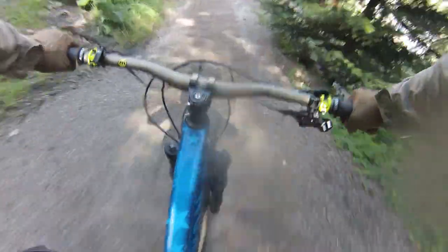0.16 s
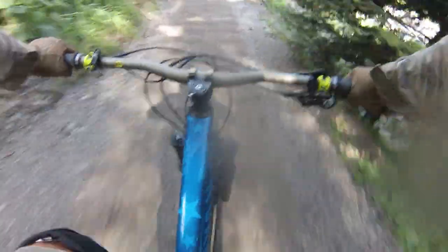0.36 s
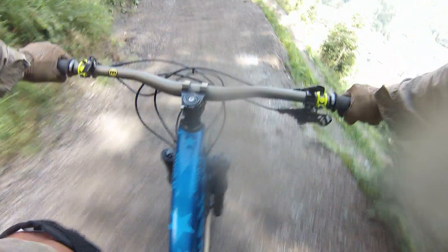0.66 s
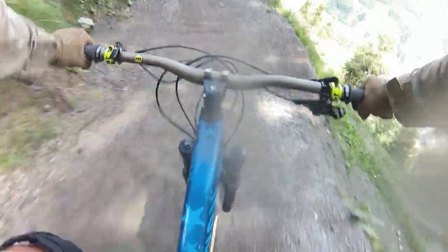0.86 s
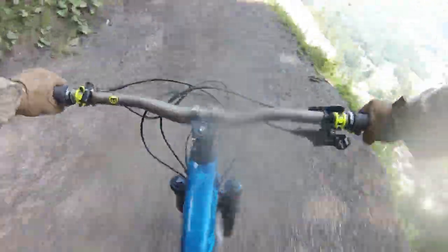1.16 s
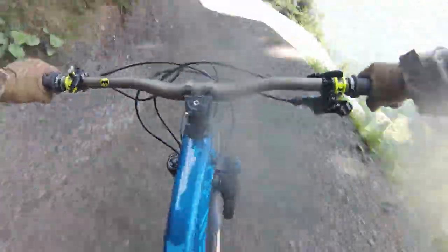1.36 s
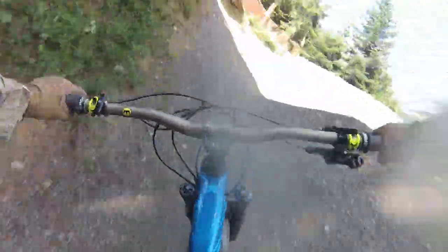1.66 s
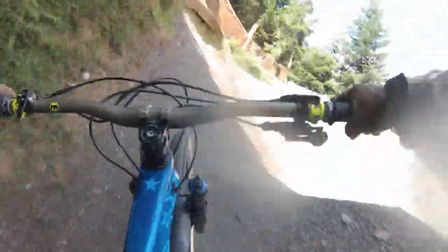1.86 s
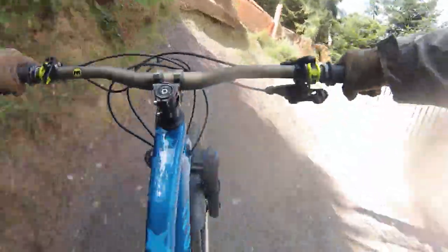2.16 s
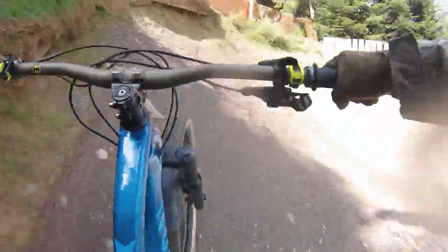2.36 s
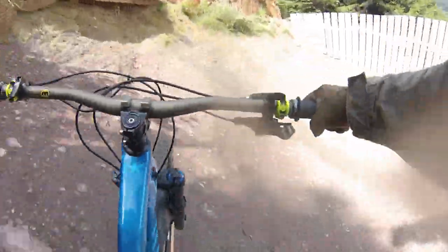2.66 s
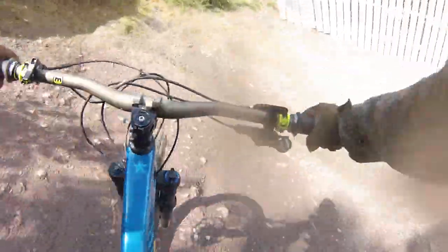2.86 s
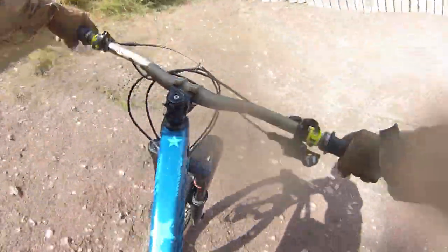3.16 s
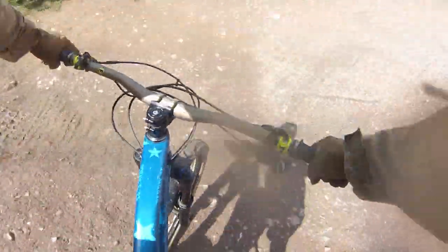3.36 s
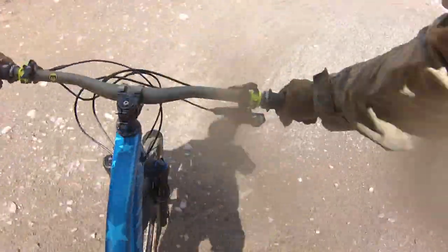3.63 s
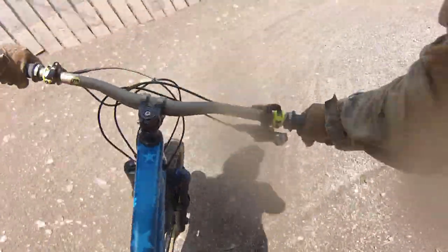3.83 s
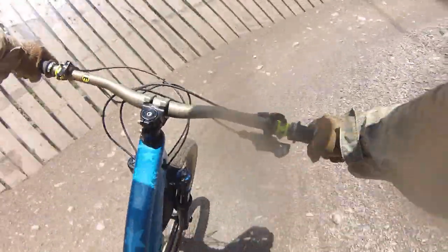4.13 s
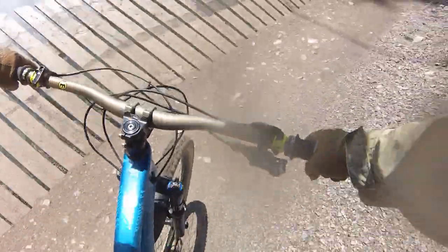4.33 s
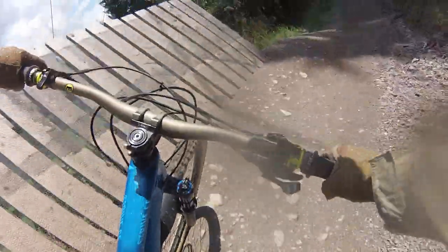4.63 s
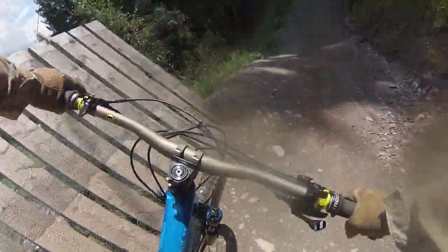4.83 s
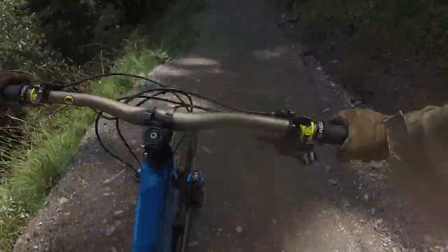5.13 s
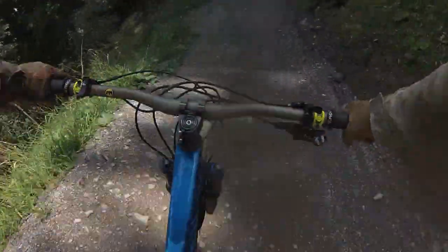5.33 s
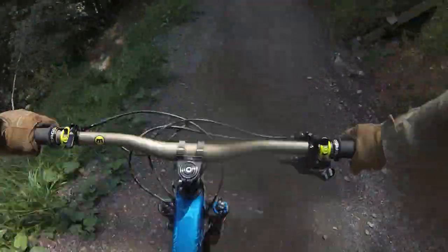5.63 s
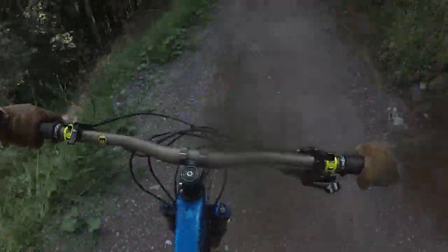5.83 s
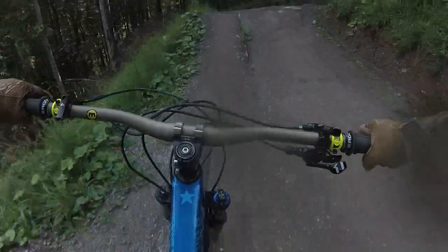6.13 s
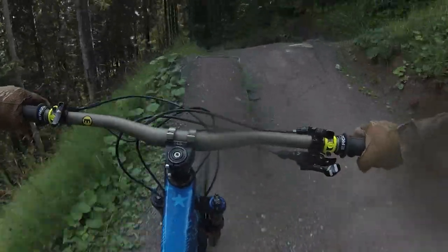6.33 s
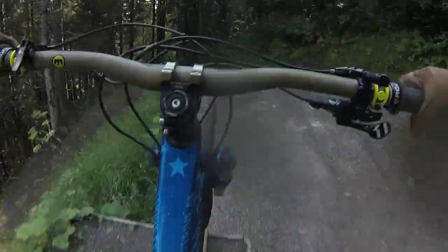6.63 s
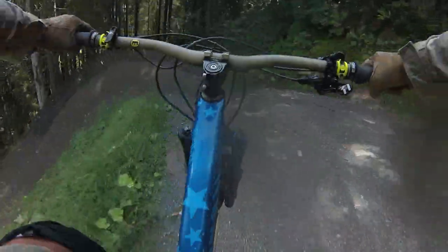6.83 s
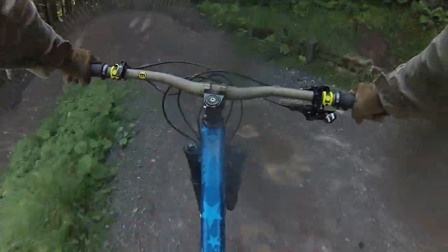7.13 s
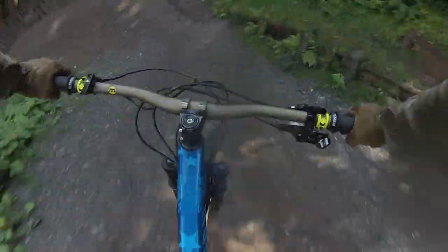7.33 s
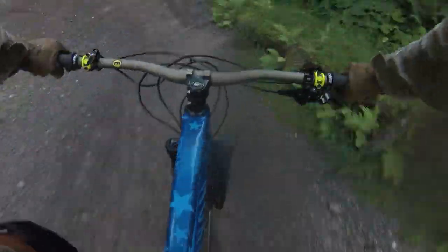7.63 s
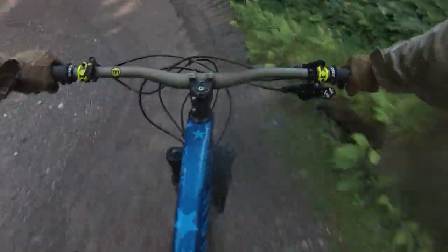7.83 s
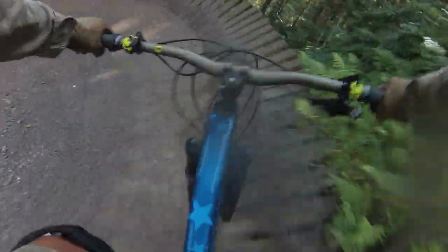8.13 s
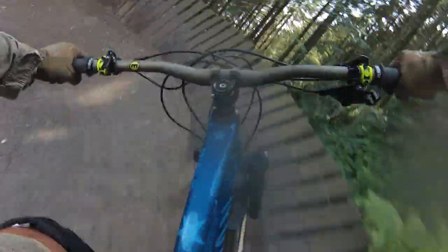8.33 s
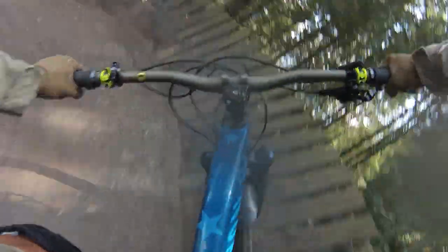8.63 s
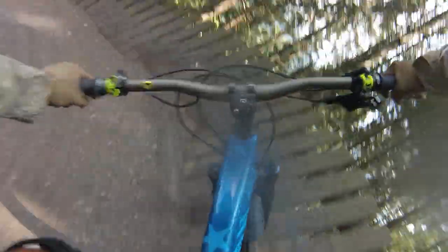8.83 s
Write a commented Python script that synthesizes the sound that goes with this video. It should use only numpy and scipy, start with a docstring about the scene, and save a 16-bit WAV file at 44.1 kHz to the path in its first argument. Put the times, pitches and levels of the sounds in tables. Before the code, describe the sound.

Close, from the rider's chest, mountain bike tyres rumble over dirt and crunch through loose gravel under low gusts of wind. Irregular plastic ticks from the camera mount mix with bright slaps and short ringing knocks on the frame. The noise eases, swells again, and the crunch and rattle briefly drop out over a small jump. After the landing, the roar softens into a faint tread hum on smoother ground.

```python
"""A mountain bike rolls fast down a gravel trail, heard by a cased camera on the rider's chest.
The tyres roar and crunch over stones while wind buffets the case and the camera ticks in its mount.
Chain, cables and flung stones slap the frame over the bumps and set its tubes ringing.
At the end the ground turns smooth: the roar drops and the tread hums."""
import sys
import numpy as np
from scipy import signal
from scipy.fft import rfft, irfft, next_fast_len
from scipy.io import wavfile

SR = 44100
rng = np.random.default_rng(int(sys.argv[2]) if len(sys.argv) > 2 else 0)


def int16_out(signal):
    """Quantize to a 16-bit WAV file."""
    q = np.round(np.clip(np.atleast_2d(signal).T, -1, 1) * 32767)
    wavfile.write(sys.argv[1], SR, q.astype(np.int16))


N = 396018

# Modes of the plastic case. Each row: pitch in Hz, level in dB, time to fall 60 dB in seconds.
CASE_MODES = [(1100, -14, 0.036), (1395, -0.5, 0.01), (2525, 9.5, 0.011), (2653, 4, 0.015),
              (3120, -5, 0.026), (4600, -9, 0.011), (8100, -13, 0.0079), (12350, -12, 0.0044)]
# Modes of the frame tubes. Each row: pitch in Hz, level in dB, time to fall 60 dB in seconds.
TUBE_MODES = [(447, -21.5, 0.048), (983, -10.5, 0.04), (1227, -12, 0.029)]


def gain_of(db):
    """Decibels to gain."""
    return 10 ** (np.asarray(db) / 20)


def unit_rms(x):
    """Scales to rms 1."""
    return x / np.sqrt(np.mean(x ** 2) + 1e-20)


def add(mix, start, sound):
    """Lays a sound into the mix at a start in seconds."""
    part = mix[max(round(start * SR), 0):][:len(sound)]
    part += sound[:len(part)]


def coloured(x, spectrum):
    """Shapes a sound by an EQ curve of (Hz, dB) points, rms 1."""
    size = next_fast_len(len(x))
    points_hz, db = np.transpose(spectrum)
    hz = np.fft.rfftfreq(size, 1 / SR)
    curve = gain_of(np.interp(np.log(hz + 1), np.log(points_hz), db))
    return unit_rms(irfft(rfft(x, size) * curve, size)[:len(x)])


def flutter(hz):
    """A random waver, mostly slower than hz, rms 1."""
    return unit_rms(signal.lfilter(*signal.butter(2, hz, fs=SR), rng.standard_normal(N)))


def ring(modes, detune=1, lift_db=0, rise_s=0.00057):
    """Dying sines after a blow, scaled to peak 1 before lift_db shifts the modes under 2 kHz."""
    hz, db, t60 = np.transpose(modes)[:, :, None]
    t = np.arange(2000) / SR
    partials = gain_of(db - 60 * t / t60) * np.sin(2 * np.pi * hz * detune * t)
    partials *= 1 - np.exp(-(t / rise_s) ** 2)
    return (partials * gain_of(lift_db * (hz < 2000))).sum(0) / abs(partials.sum(0)).max()


def grains(per_s, spread_db, t60):
    """Random puffs of noise with sharp starts; a few are large."""
    sizes = gain_of(spread_db * np.minimum(rng.exponential(1, N), 4))
    onsets = rng.random(N) < per_s / SR
    decay = gain_of(-60 / (t60 * SR))
    return signal.lfilter([1], [1, -decay], sizes * onsets) * rng.standard_normal(N)


def ride_db(layer):
    """The fader of the "wind" or the "roar" along the trail."""
    # Each row: time in seconds, wind level in dB, roar level in dB before its drop on smooth ground.
    faders = [(0.0, -35, -37), (0.32, -40.5, -34), (0.37, -34, -37), (0.6, -43, -33), (1.07, -36.5, -35.5),
              (1.15, -43.5, -35.5), (2.37, -43.5, -49), (2.4, -51, -48), (3.3, -49, -48.5),
              (3.83, -43, -42), (4.05, -46, -43), (4.45, -40, -41), (4.6, -44, -41.5), (5.13, -39, -43.5),
              (5.33, -26, -34.5), (5.38, -33.5, -36), (6.3, -40.5, -34.5), (6.88, -27, -38.5),
              (6.93, -33, -39), (7.6, -38, -35), (8.85, -50.5, -41), (8.98, -55, -44)]
    times, wind_db, roar_db = np.transpose(faders)
    return np.interp(np.arange(N) / SR, times, {"wind": wind_db, "roar": roar_db}[layer])


def grit_db():
    """Looseness of the ground as a crunch level, hushed during a short jump near 7 s."""
    # Each row: time in seconds, crunch level in dB.
    looseness = [(0.0, -60.5), (0.14, -50.5), (0.77, -49), (1.2, -48), (1.46, -59), (1.86, -61),
                 (2.11, -68.5), (3.0, -62.5), (3.28, -69), (3.81, -55.5), (4.15, -62), (4.92, -61.5),
                 (5.65, -59), (6.01, -54), (6.21, -58.5), (6.6, -60.5), (6.99, -70), (7.28, -67),
                 (7.325, -54.5), (8.23, -52), (8.57, -59), (8.98, -58)]
    return np.interp(np.arange(N) / SR, *np.transpose(looseness))


def wind():
    """Lumpy low buffeting on the case, in quick gusts."""
    # Colour of the buffeting. Each row: frequency in Hz, relative level in dB.
    spectrum = [(10, -29), (30, 4), (60, -2), (96, -5), (150, -11), (300, -21), (700, -27.5), (2000, -74)]
    gusts_db = 1.8 * flutter(hz=5.1) + 1.2 * flutter(hz=5.1)
    rumble = coloured(rng.standard_normal(N), spectrum)
    return gain_of(ride_db("wind")) * unit_rms(rumble * gain_of(gusts_db))


def tyres():
    """Knobs drum on the dirt in a wavering roar, stones pop under them, and the air inside sings."""
    # Colour of the roar. Each row: frequency in Hz, relative level in dB.
    spectrum = [(40, -34), (90, 1), (140, -1.5), (250, -2), (320, -4.5), (520, -7.5), (620, -9.5),
                (800, -13), (980, -12), (1450, -20), (1900, -36), (4000, -70)]
    # Modes of the air in the tyre. Each row: pitch in Hz, level in dB, time to fall 60 dB in seconds.
    cavity_modes = [(252.4, 6, 0.13), (499, -5.5, 0.16)]
    smooth_from_s, smooth_db = 8.23, -4
    drumming = rng.standard_normal(N) * gain_of(1.76 * flutter(hz=21))
    pops = unit_rms(grains(per_s=150, spread_db=1.5, t60=0.054))
    roar = coloured(drumming + 0.5 * pops, spectrum)
    roar_db = ride_db("roar") + smooth_db * (np.arange(N) / SR > smooth_from_s)
    air = unit_rms(signal.oaconvolve(rng.standard_normal(N), ring(cavity_modes))[:N])
    return gain_of(roar_db) * roar + gain_of(-12 + 0.67 * grit_db()) * air


def gravel():
    """Stones grind into a hiss and snap one by one, each size in its own colour."""
    # Colour of the crunch. Each row: frequency in Hz, relative level in dB.
    spectrum = [(800, -21), (2000, 10.5), (4000, 2.5), (6000, 2.5), (7500, 0), (10000, -7), (12500, -12),
                (13500, -18), (15000, -17)]
    grind = rng.standard_normal(N) * gain_of(2.2 * flutter(hz=13))
    snaps = np.zeros(N)
    for hz in (2470, 4450, 8750, 10800):
        band = signal.butter(1, [hz / 1.5, hz * 1.08], "band", fs=SR)
        snaps += signal.lfilter(*band, grains(per_s=42, spread_db=4, t60=0.023))
    snap_gain = gain_of(17.5 + 0.32 * grit_db())  # looser ground leans towards snaps
    return gain_of(grit_db()) * coloured(grind + snap_gain * unit_rms(snaps), spectrum)


def clatter():
    """Small stones pelt the frame tubes, more on loose ground; the tubes ring only briefly."""
    pelting = grains(per_s=300, spread_db=3, t60=0.015)
    damped_tubes = ring(TUBE_MODES) * gain_of(-60 * np.arange(2000) / SR / 0.044)
    return gain_of(0.9 * grit_db()) * unit_rms(signal.oaconvolve(pelting, damped_tubes)[:N])


def hiss():
    """A faint, steady, bright hiss under the ride."""
    # Colour of the hiss. Each row: frequency in Hz, relative level in dB.
    spectrum = [(1500, -10), (4000, -1), (5500, 2), (6150, 4), (6800, -0.5), (10000, -1), (11200, 4.5),
                (12300, -5), (15500, -2)]
    return gain_of(-73) * coloured(rng.standard_normal(N), spectrum)


def camera_case():
    """The plastic case hums under dense shaking, and carries the ticks and rubs of its mount."""
    low_modes = [mode for mode in CASE_MODES if mode[0] < 4000]  # soft contact wakes only these
    body = ring(low_modes, lift_db=-8)
    shaking = rng.standard_normal(N) + unit_rms(grains(per_s=200, spread_db=1.5, t60=0.0052))
    hum = gain_of(-11 + 0.77 * grit_db()) * unit_rms(signal.oaconvolve(shaking, body)[:N])
    out = hum + mount_ticks() + mount_rubs() / np.linalg.norm(body)
    for hz, q in ((1900, 3.5), (3900, 4)):  # groups of modes cancel between them
        out = signal.lfilter(*signal.iirnotch(hz, q, fs=SR), out)
    return out


def mount_ticks():
    """The camera knocks in its mount and bounces once; the case rings a little differently each time."""
    # Each row: start in seconds, level in dB before the low lift, bounce in dB against the knock.
    ticks = [(0.0292, -26.5, -23), (0.0933, -23, -15), (0.247, -25.5, -20), (0.2988, -28, -20),
             (0.3502, -27, -20), (0.3687, -23.5, -23), (0.4476, -18.5, -24), (0.535, -35, 3),
             (0.5537, -23, -20), (0.5608, -17, -5), (0.6175, -21.5, -13), (0.651, -24, -5),
             (0.6641, -27, -18), (0.6813, -22, -17), (0.794, -29, -23), (0.8154, -15, -9), (0.924, -29, -2),
             (0.955, -18.5, -9), (1.0142, -22.5, -20), (1.182, -24, -20), (1.2135, -22.5, -14),
             (1.3649, -25, -1), (1.471, -23, -22), (1.5198, -22, -20), (1.5284, -29, -20),
             (1.68, -25.5, -20), (1.7498, -25.5, 3), (1.934, -24.5, -3.5), (2.5426, -30, -9),
             (2.604, -28, 1.5), (2.849, -43, -15), (2.9121, -18, -22), (2.9644, -27, -11),
             (3.066, -42, -18), (3.303, -48, -18), (3.361, -42, -19), (3.485, -35, -19), (3.544, -36, -10),
             (3.6776, -34, -20), (3.787, -24, -20), (3.821, -22, -6), (3.9917, -21.5, -10),
             (4.0809, -30.5, -4), (4.1404, -20, -4.5), (4.329, -26.5, -19), (4.509, -18.5, -8),
             (4.6156, -23.5, -10), (4.642, -43, -15), (4.67, -26.5, -8), (4.819, -41, -11),
             (4.898, -38.5, -8), (4.9734, -35, -15), (5.126, -35.5, -13), (5.3786, -31, 4),
             (5.415, -38, -3), (5.479, -24, -4.5), (5.535, -40, -9), (5.641, -32, -20), (5.6725, -31, -18),
             (5.677, -22.5, -7), (5.74, -21.5, -23), (5.8133, -19, -8.5), (5.8722, -25, -2),
             (5.9204, -20.5, -20), (6.0091, -20.5, -8), (6.119, -31, -20), (6.1541, -26, 1.5),
             (6.1652, -24.5, -7), (6.3988, -25.5, -20), (6.483, -31, -17), (6.608, -26, -18),
             (6.631, -31, -18), (6.649, -30, -20), (6.7608, -29.5, -22), (7.323, -33, -23),
             (7.332, -29.5, -17), (7.5586, -30, -20), (7.585, -21.5, -4.5), (7.678, -26.5, -20),
             (7.71, -24.5, -5), (7.7667, -31, -22), (7.7952, -18, -9), (7.901, -34, -15), (8.176, -32, -15),
             (8.306, -47, -15), (8.3408, -20, -10), (8.409, -26.5, -22), (8.4543, -20.5, -27),
             (8.4883, -23.5, -20), (8.5625, -24.5, -20), (8.5672, -23.5, -24), (8.6793, -30, -20),
             (8.7267, -22.5, 2), (8.7351, -27, 2.5), (8.8488, -34, -15), (8.878, -29, -17),
             (8.925, -22.5, -5), (8.932, -25.5, -17)]
    hard_db, softening = -9, 0.6  # each dB under a hard knock lifts the low modes by 0.6 dB
    snap_shape = np.r_[np.zeros(12), gain_of(-19 - 60 * np.arange(400) / SR / 0.008)]
    bright_band = signal.butter(3, [4400, 12800], "band", fs=SR)
    detunes = rng.uniform(0.939, 1.101, (len(ticks), len(CASE_MODES), 1))
    noises = rng.standard_normal((len(ticks), len(snap_shape)))
    bounce_delays_s = rng.uniform(0.00442, 0.0055, len(ticks))
    out = np.zeros(N)
    for (start, db, bounce_db), detune, noise, delay in zip(ticks, detunes, noises, bounce_delays_s):
        knock = ring(CASE_MODES, detune, lift_db=softening * (hard_db - db))
        add(knock, 0, snap_shape * signal.lfilter(*bright_band, noise))  # dry snap of contact
        add(out, start, gain_of(db) * knock)
        add(out, start + delay, gain_of(db + bounce_db) * knock)
    return out


def frame_slaps():
    """Chain, cables and flung stones crack brightly on the frame, coloured by where they land."""
    # Each row: start in seconds, level in dB, time to fall 60 dB in seconds.
    slaps = [(0.0802, -32.5, 0.011), (0.1667, -42, 0.0093), (0.2268, -42, 0.03), (0.2738, -38, 0.016),
             (0.2829, -34, 0.01), (0.2914, -35, 0.016), (0.3524, -35.5, 0.019), (0.404, -38, 0.015),
             (0.5552, -9.5, 0.0043), (0.6013, -33, 0.038), (0.617, -35, 0.056), (0.636, -28, 0.015),
             (0.6537, -35, 0.038), (0.677, -36.5, 0.07), (0.7126, -27, 0.0058), (0.7323, -35, 0.038),
             (0.7486, -36, 0.015), (0.78, -39, 0.031), (0.8783, -41, 0.024), (0.9165, -37, 0.018),
             (0.9568, -20, 0.0066), (1.018, -35.5, 0.015), (1.0845, -37.5, 0.033), (1.194, -40, 0.022),
             (1.25, -37.5, 0.022), (1.3767, -41.5, 0.022), (2.541, -46, 0.017), (2.724, -48, 0.012),
             (2.8228, -46, 0.012), (2.8307, -39.5, 0.0066), (2.8418, -45, 0.012), (3.0078, -42, 0.0044),
             (3.271, -46, 0.0092), (3.4575, -48, 0.012), (3.646, -42.5, 0.012), (3.741, -45, 0.019),
             (3.821, -24, 0.012), (5.0546, -42.5, 0.013), (5.167, -45, 0.015), (5.2316, -43, 0.017),
             (5.241, -37.5, 0.011), (5.4003, -43, 0.012), (5.6207, -43, 0.013), (6.009, -28, 0.022),
             (6.0223, -45, 0.018), (7.34, -42, 0.014), (7.5922, -44, 0.053), (7.645, -31.5, 0.0095),
             (7.6852, -37.5, 0.016), (7.7087, -39, 0.018), (7.727, -38, 0.029), (7.7742, -37.5, 0.013),
             (7.8452, -38, 0.013), (7.8744, -36.5, 0.015), (7.961, -38, 0.021), (8.007, -36, 0.032),
             (8.0197, -42, 0.053), (8.0363, -37, 0.017), (8.083, -48, 0.015), (8.113, -44, 0.02),
             (8.172, -46, 0.063), (8.3044, -38.5, 0.018), (8.363, -45.5, 0.086)]
    brightest_hz, spread = 6600, 0.11
    out, t = np.zeros(N), np.arange(3000) / SR
    hz = np.fft.rfftfreq(len(t), 1 / SR) + 1
    band = 1 / (1 + (3000 / hz) ** 4) / (1 + (hz / 12500) ** 6)
    for start, db, t60 in slaps:
        noise = rng.standard_normal(len(t))
        centre_hz = brightest_hz * np.exp(spread * noise[0])
        colour = band * (0.8 + np.exp(-(np.log(hz / centre_hz) / 0.25) ** 2))
        envelope = gain_of(-60 * t / t60) * (1 - np.exp(-t / 0.0003))
        add(out, start, gain_of(db) * unit_rms(irfft(rfft(noise) * colour)) * envelope)
    return out


def tube_knocks():
    """Blows ring the frame tubes, each at slightly different pitches."""
    # Each row: start in seconds, peak level in dB.
    knocks = [(0.349, -20.5), (0.424, -28), (0.53, -32), (0.555, -27), (0.621, -22.5), (0.675, -23),
              (0.731, -28.5), (0.923, -30), (1.055, -25), (1.181, -23.5), (3.39, -37.5), (3.637, -33.5),
              (3.82, -23), (6.006, -27), (7.705, -25.5), (8.305, -31)]
    out = np.zeros(N)
    for start, db in knocks:
        detune = rng.uniform(0.92, 1.03, (len(TUBE_MODES), 1))
        add(out, start, gain_of(db) * ring(TUBE_MODES, detune, rise_s=0.0011))
    return out


def stone_thuds():
    """A stone knocks dully under the frame."""
    # Each row: start in seconds, peak level in dB.
    thuds = [(2.961, -19), (3.819, -26.5)]
    # Modes of the thud. Each row: pitch in Hz, level in dB, time to fall 60 dB in seconds.
    modes = [(300, 7, 0.019), (540, 2.5, 0.042), (1080, 0.5, 0.032), (1276, -3, 0.034)]
    out = np.zeros(N)
    for start, db in thuds:
        add(out, start, gain_of(db) * ring(modes, rise_s=0.0021))
    return out


def mount_rubs():
    """The case rubs in its mount: short scrapes that favour its low modes."""
    # Each row: start in seconds, length in seconds, relative level in dB.
    rubs = [(4.071, 0.014, -49), (4.551, 0.022, -49.5), (5.67, 0.02, -47), (8.507, 0.028, -56)]
    out = np.zeros(N)
    for start, length, db in rubs:
        scrape = rng.standard_normal(2000) * (np.arange(2000) < length * SR)
        add(out, start, gain_of(db) * signal.oaconvolve(scrape, ring(CASE_MODES, lift_db=19.5)))
    return out


def tread_hum():
    """On smooth ground the knobs pass evenly and hum a faint stack of harmonics."""
    # Each row: time in seconds, hum level in dB.
    fader = [(8.2, -70), (8.33, -48), (8.6, -47), (8.98, -49)]
    knob_hz, harmonics_db = 140, (0, -1, -4, -6, -6)
    cycles = np.cumsum(knob_hz * (1 + 0.001 * flutter(hz=3))) / SR
    hum = sum(gain_of(db) * np.sin(2 * np.pi * (k * cycles + rng.random()))
              for k, db in enumerate(harmonics_db, 1))
    level_db = np.interp(np.arange(N) / SR, *np.transpose(fader), left=-200)
    return gain_of(level_db) * unit_rms(hum)


def scene():
    """Everything reaches one microphone."""
    bed = hiss() + wind() + tyres() + tread_hum() + gravel()
    rattles = clatter() + camera_case() + frame_slaps() + tube_knocks() + stone_thuds()
    return (bed + rattles)[None]


def record(dry):
    """Cuts the rumble under 12 Hz and the treble above 15.4 kHz."""
    low_cut = signal.lfilter(*signal.butter(2, 12, "high", fs=SR), dry)
    top_filter = signal.firwin(511, 15400, window=("kaiser", 9), fs=SR)
    return signal.oaconvolve(low_cut, top_filter[None], "same")


dry = scene()
out = record(dry)
int16_out(out)
```